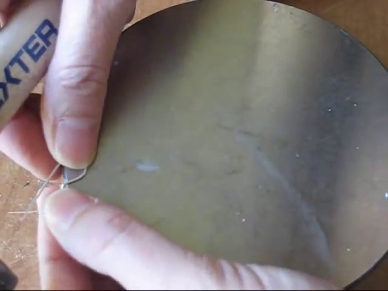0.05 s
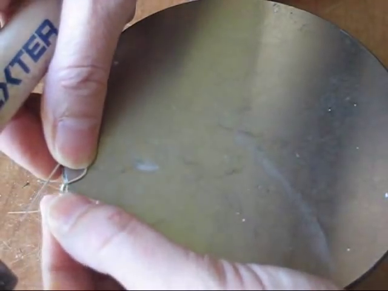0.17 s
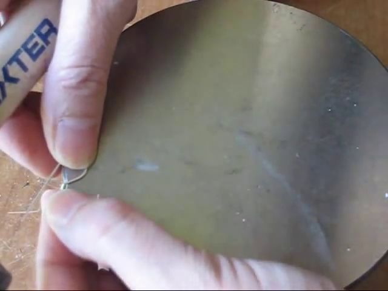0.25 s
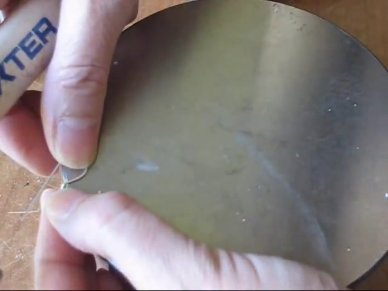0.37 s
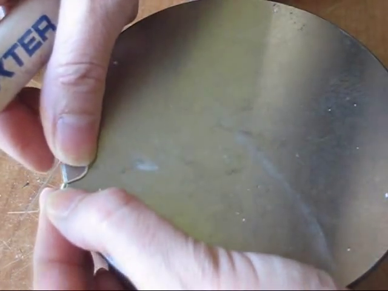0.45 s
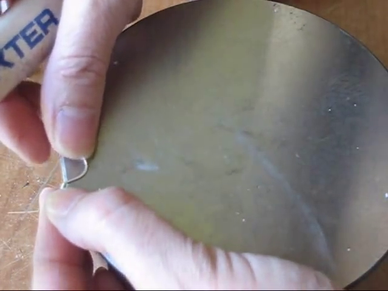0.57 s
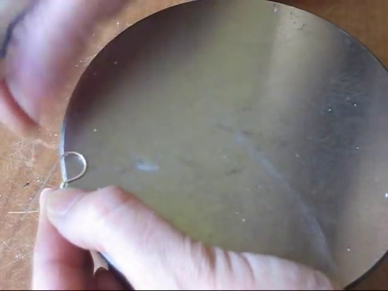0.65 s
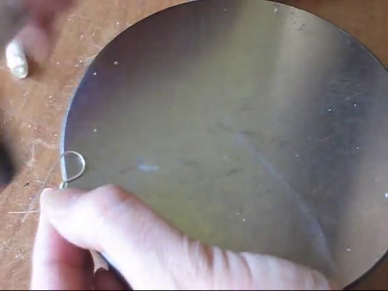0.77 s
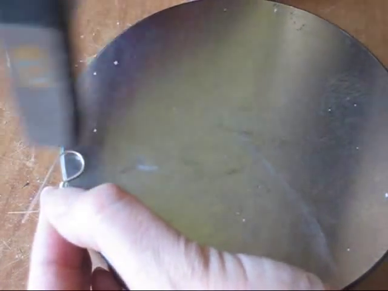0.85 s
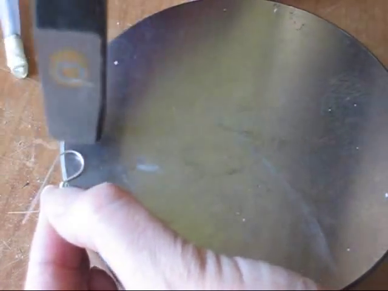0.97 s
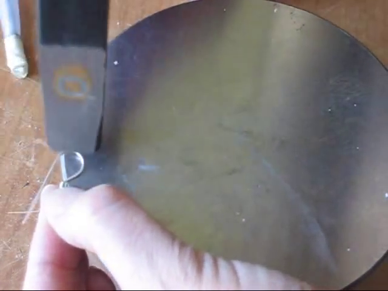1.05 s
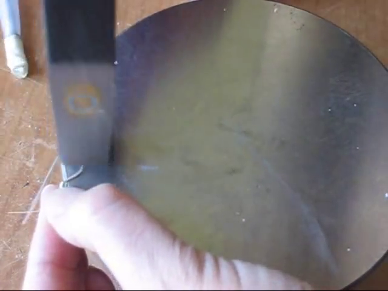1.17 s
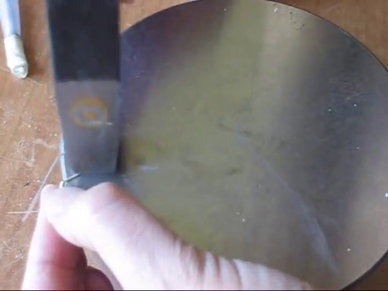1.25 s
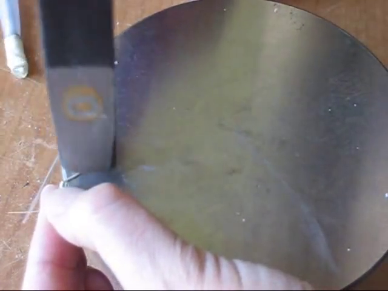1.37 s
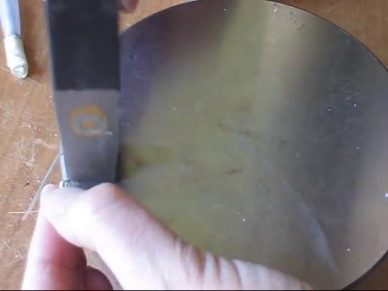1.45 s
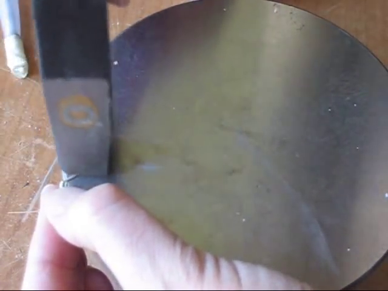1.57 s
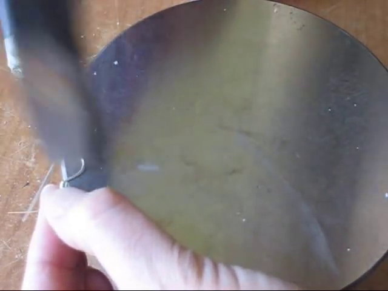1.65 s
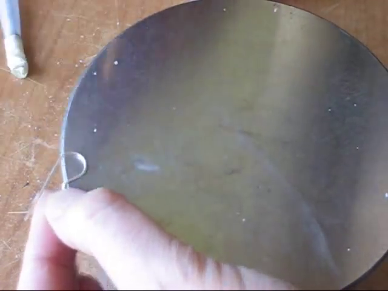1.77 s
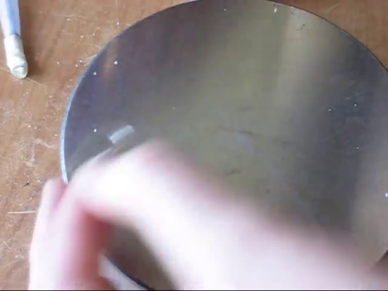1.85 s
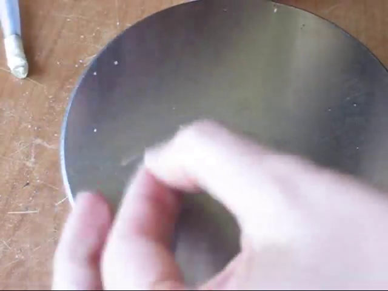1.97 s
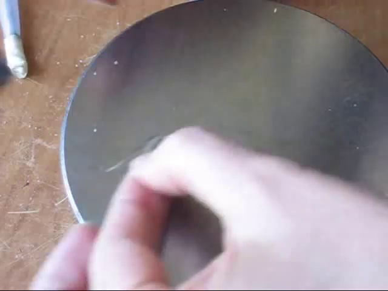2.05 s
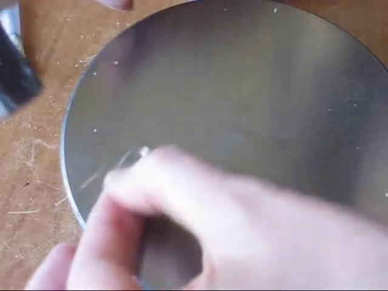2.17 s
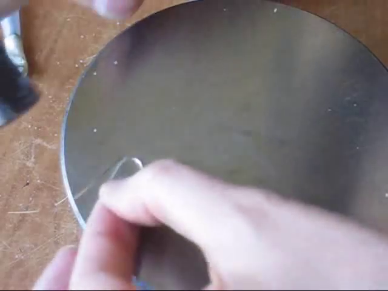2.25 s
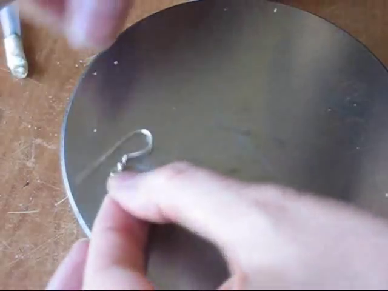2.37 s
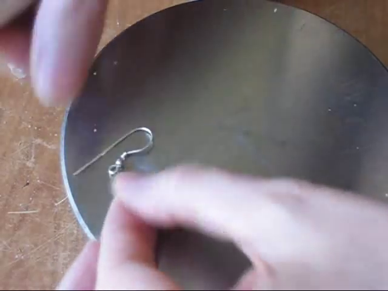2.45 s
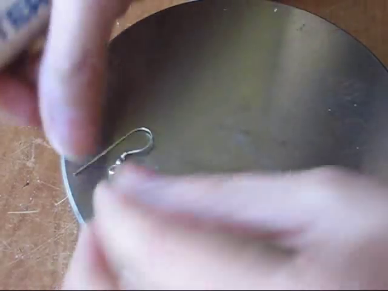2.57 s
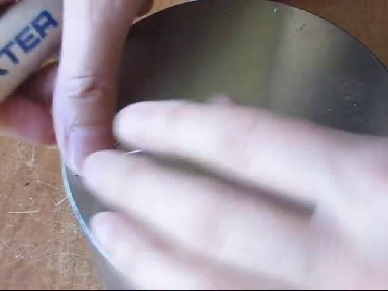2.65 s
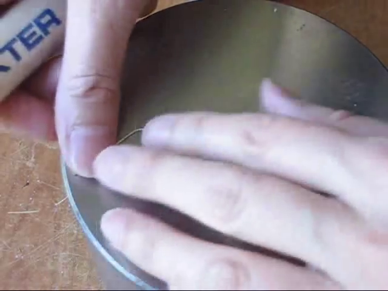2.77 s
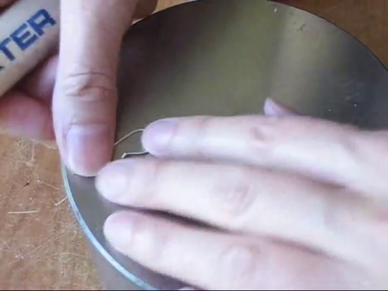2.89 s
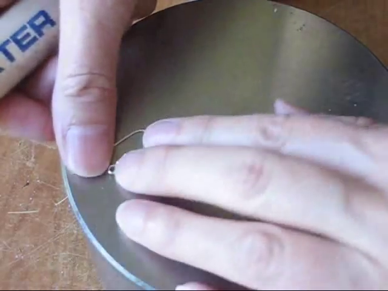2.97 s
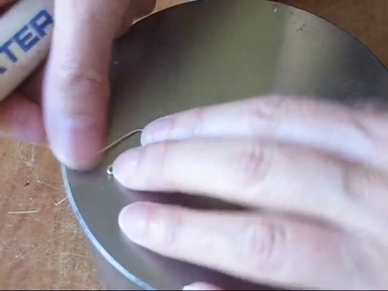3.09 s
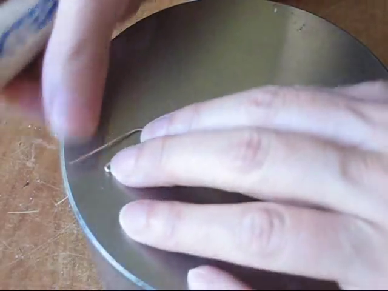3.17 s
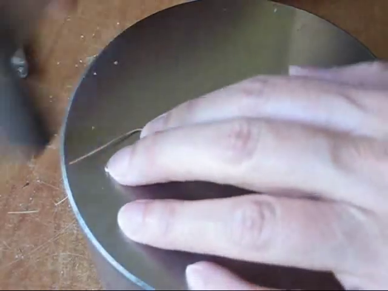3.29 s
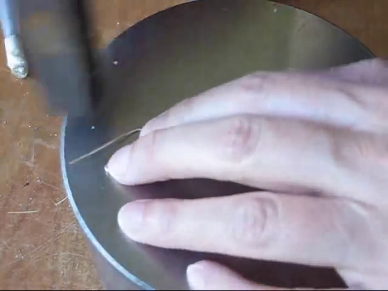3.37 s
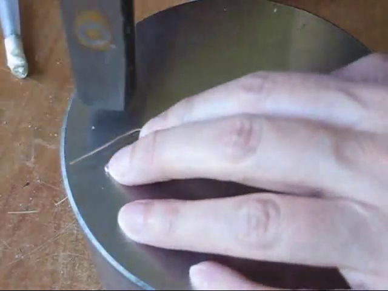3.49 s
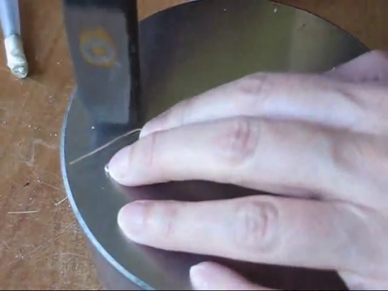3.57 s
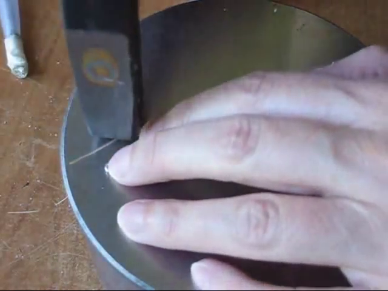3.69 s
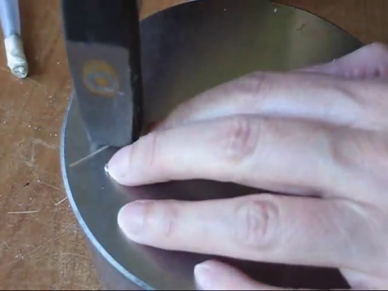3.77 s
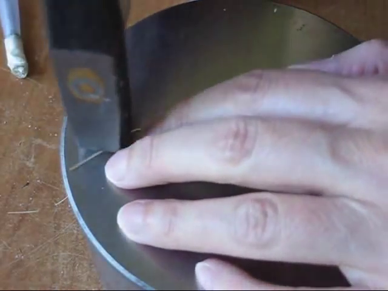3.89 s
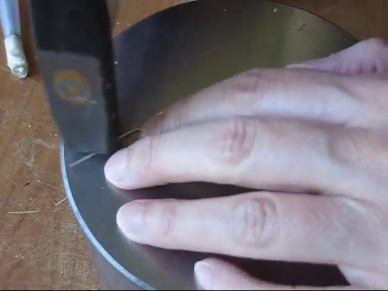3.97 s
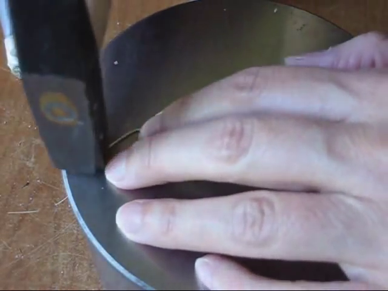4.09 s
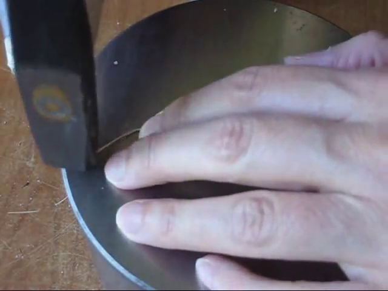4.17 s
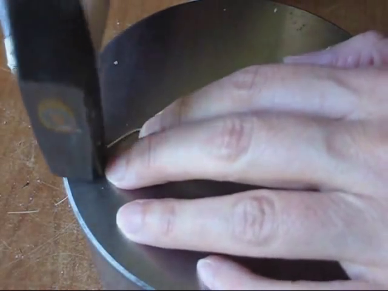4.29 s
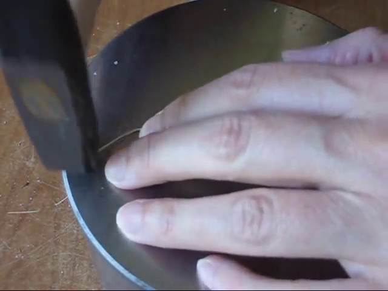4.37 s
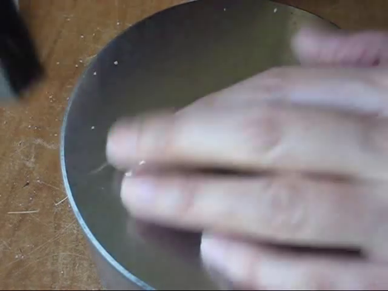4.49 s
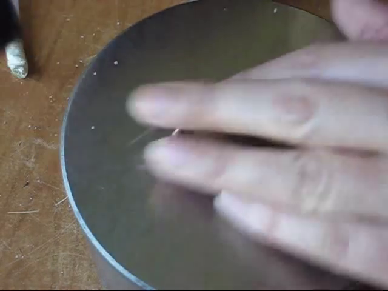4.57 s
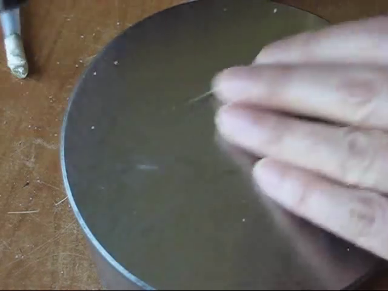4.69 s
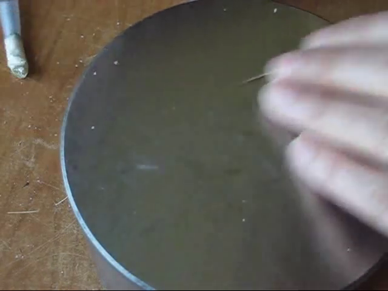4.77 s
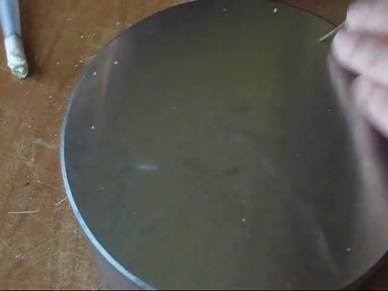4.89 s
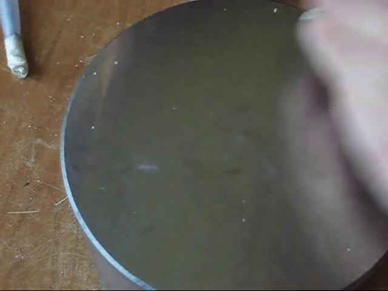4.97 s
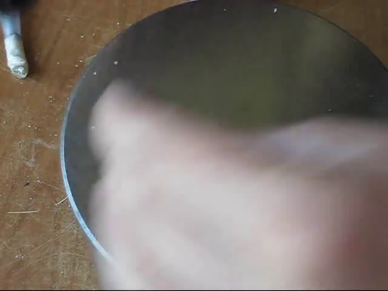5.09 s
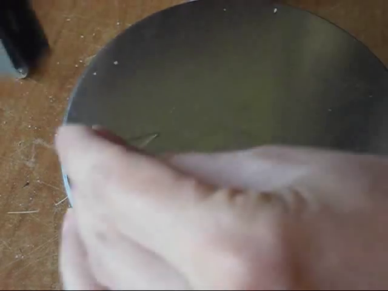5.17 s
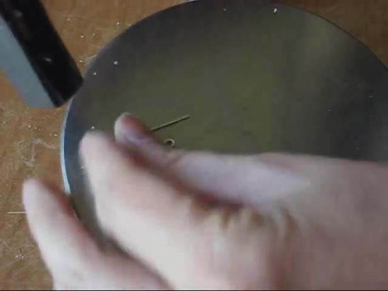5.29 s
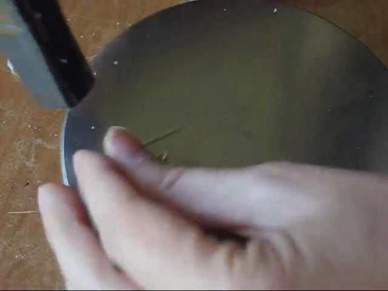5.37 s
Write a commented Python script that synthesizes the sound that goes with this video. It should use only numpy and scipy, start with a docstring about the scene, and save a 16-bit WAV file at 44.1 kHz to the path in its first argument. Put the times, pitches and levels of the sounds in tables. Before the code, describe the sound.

A close, coarse pocket-camera sound of hammering at a bench in a small room. Gritty hiss, a thin buzzing electronic whine and a faint gliding low drone run throughout. A barely audible scrape comes near 0.8 s. At about 1.27, 1.49 and 1.64 s a light hammer hits wire on a steel block: hard, short clinks, the second strongest with a brief wire ring, each followed by a tiny rebound click and a dull wooden table thump. The room answers for about half a second. At 2.0 s a hand bumps the table softly; low rumble swells near 3 s, with a small scratch at 3.26 s. The second group falls at 3.68 s, bright and thin, 3.83 and 4.14 s, weaker and duller, and 4.35 s, loud and ringing. The tail fades into hiss; tiny scratches at 5.2-5.3 s accompany a last low rumble.

```python
"""At a bench in a small room, a light hammer flattens a wire on a steel block in two quick groups of taps.
Damped modes ring the block, hammer head and wire; swelling and dying low modes thump the wooden table.
Decaying noise gives the room's answer; scrapes, a nudge, rumble, hiss and a gliding drone lie beneath.
A pocket camera listens: its own whine, gain control and a coarse 8-bit, 11 kHz converter."""
import sys
import numpy as np
from scipy import signal
from scipy.fft import rfft, irfft, next_fast_len
from scipy.io import wavfile

SR = 44100
rng = np.random.default_rng(int(sys.argv[2]) if len(sys.argv) > 2 else 0)


def log_audio(samples):
    """Write samples as a 16-bit WAV file to the path given in sys.argv[1]."""
    # one column per channel
    frames = np.atleast_2d(samples).T
    # limit to full scale, then quantise
    limited = np.clip(frames, -1, 1)
    pcm = np.round(limited * 32767).astype(np.int16)
    wavfile.write(sys.argv[1], SR, pcm)


N = 239683  # samples
TIME = np.arange(N) / SR  # s


def amp(db):
    """Level law: amplitude gain is ten to the power dB / 20."""
    return 10 ** (np.asarray(db) / 20)


def unit(x):
    """Normalisation to a root-mean-square amplitude of 1."""
    return x / np.sqrt(np.mean(x ** 2))


def along(points, hz):
    """Linear interpolation of a (frequency [Hz], value) table on a logarithmic frequency axis."""
    f, v = np.transpose(points)
    return np.interp(np.log(hz + 1), np.log(f), v)


def dying(t, t60):
    """Exponential decay of a damped mode, 60 dB down at t60 seconds."""
    return np.exp(-np.log(1000) * t / t60)


def filtered(x, gain):
    """Linear filtering: the spectrum of x times a gain that depends on frequency."""
    size = next_fast_len(len(x) + 8192)  # zero padding limits wrap-around
    spectrum = rfft(x, size)
    hz = np.fft.rfftfreq(size, 1 / SR)
    return irfft(spectrum * gain(hz), size)[:len(x)]


def band_noise(size, low_hz, high_hz):
    """Band-limited noise of rms 1, with a gentle lower edge and a steeper upper one."""
    def band(f):
        low_edge = (f / low_hz) ** 2
        return low_edge / (1 + low_edge) / (1 + (f / high_hz) ** 10)
    return unit(filtered(rng.standard_normal(size), band))


def swells(events):
    """Gaussian envelopes, one for each (time [s], level [dB], length to 1/e [s]) event."""
    return sum(amp(db) * np.exp(-((TIME - s) / length) ** 2) for s, db, length in events)


def add(track, s, sound):
    """Superposition: mix a sound into the track at s seconds."""
    part = track[round(s * SR):][:len(sound)]
    part += sound[:len(part)]


def hiss(hiss_db=-49):
    """Stationary random noise, coloured by a smooth spectral envelope."""
    # spectral shape of the noise: (frequency [Hz], relative level [dB per Hz])
    colour = [(20, 1.5), (60, 10), (110, 7), (220, 5), (450, 1.5), (1000, -2), (2500, -3), (3400, -3),
              (4200, -4), (5500, -14)]
    return amp(hiss_db) * unit(filtered(rng.standard_normal(N), lambda f: amp(along(colour, f))))


def drone():
    """Resonance: two harmonics, perhaps of a distant motor, glide and swell where they meet room modes."""
    # speeding up and easing off: (time [s], fundamental frequency [Hz])
    glide = [(0, 87.5), (1.0, 95.36), (3.5, 108.1), (5.43, 97.8)]
    # fundamental, then octave, away from any resonance: (level [dB rms])
    partial_db = [-63, -69]
    # room resonances: (frequency [Hz], half width [Hz], lift [dB])
    lifts = [(92.1, 3, 11), (208.3, 1.8, 12)]
    hz = np.interp(TIME, *np.transpose(glide))
    phase = 2 * np.pi * np.cumsum(hz) / SR

    def lift_db(f):
        return sum(db / (1 + ((f - centre) / width) ** 2) for centre, width, db in lifts)
    partials = sum(amp(db + lift_db(k * hz)) * np.sin(k * phase) for k, db in enumerate(partial_db, 1))
    return np.sqrt(2) * partials


def whine(frame_rate=30):
    """Phase modulation: two electronic tones jump in phase at every picture frame, giving a fine buzz."""
    # the camera's electronics: (frequency [Hz], offset within each frame [Hz], level [dB rms])
    tones = [(2778, -12.5, -51), (3177, -16.5, -55)]
    in_frame = TIME % (1 / frame_rate)  # s since the frame began
    return sum(np.sqrt(2) * amp(db) * np.sin(2 * np.pi * (hz * TIME + offset * in_frame))
               for hz, offset, db in tones)


def rumble(centre_hz=64, width_hz=5, rest_db=-69):
    """Resonant filtering: narrow noise in the table's lowest modes swells as hands lean on the block."""
    # the hands lean: (time [s], level [dB], length to 1/e [s])
    leans = [(2.95, -61, .45), (5.33, -54, .12)]
    noise = unit(filtered(rng.standard_normal(N), lambda f: 1 / (1 + ((f - centre_hz) / width_hz) ** 2)))
    return (amp(rest_db) + swells(leans)) * noise


def thump(t, swell=0.0034, steepness=3):
    """Forced motion: the pushed table top swings for a few cycles under a pulse peaking at swell seconds."""
    # the table top giving way under the block: (frequency [Hz], level [dB])
    table_modes = [(210, -9.5), (450, -16), (1040, -29.5)]
    push = (t / swell * np.exp(1 - t / swell)) ** steepness
    swings = sum((-1) ** k * amp(db) * np.sin(2 * np.pi * hz * t) for k, (hz, db) in enumerate(table_modes))
    return push * swings


def boom(t, deep_db, rise=0.004, pivot_hz=200, tilt_db=1.34, deep_hz=136):
    """Modal reverberation: low modes build up after the push and die slowly."""
    # low modes of table and room: (frequency [Hz], level before colouring [dB], t60 [s])
    low_modes = [(63.1, -21, 0.28), (68.3, -21.5, 0.35), (106.7, -27, 0.3), (131.4, -20, 0.27),
                 (160.3, -33, 0.65), (182, -26.5, 0.59), (189.1, -27.5, .48), (219.4, -30, 0.4),
                 (236.4, -33, .42), (257.7, -34.5, 0.69), (278, -27.5, .48), (307, -33.5, 0.64),
                 (332.6, -27.5, 0.17), (365, -43, 0.84), (412, -33, 0.3), (445, -31.5, .38),
                 (645, -34.5, 0.24), (701, -38.5, 0.37), (752, -35.5, 0.2), (899, -46.5, 0.53),
                 (1078, -42, 0.34)]

    def colour_db(hz):
        tilt = tilt_db * np.log2(hz / pivot_hz)  # tilt_db per octave
        return tilt + deep_db / (1 + (hz / deep_hz) ** 4)  # deep_db acts mostly below deep_hz
    modes = sum((-1) ** k * amp(db + colour_db(hz)) * dying(t, t60) * np.sin(2 * np.pi * hz * t)
                for k, (hz, db, t60) in enumerate(low_modes))
    return modes * (1 - np.exp(-t / rise))


def scrapes():
    """Friction noise: fingers shift the wire on the steel, in faint bursts of high-frequency noise."""
    # (time [s], level [dB], length to 1/e [s])
    shifts = [(0.766, -53, 0.061), (3.257, -48.5, 0.0084), (5.192, -44, 0.0069), (5.271, -42, 0.0037),
              (5.322, -46, 0.01)]
    return swells(shifts) * band_noise(N, 4300, 6100)


def nudge(deep_db=-3):
    """Impulsive excitation: a hand settles against the table and moves its low modes."""
    # (time [s], level [dB])
    nudges = [(2.035, -28.5)]
    track, t = np.zeros(N), np.arange(SR // 2) / SR
    for s, db in nudges:
        add(track, s, amp(db) * (thump(t) + boom(t, deep_db)))
    return track


def room(t, dip_s=0.027, dip_width=0.011, dip_db=-2.0, first_wall=0.007):
    """Diffuse reverberation: noise decays at a rate set by frequency, with a brief dip around dip_s."""
    # tone of the room's answer, tail at unit energy: (frequency [Hz], gain [dB])
    walls = [(60, -14), (130, -12.5), (210, -13), (400, -1), (550, -4.5), (740, 4.5), (1100, -2),
             (1500, -12), (2400, -17), (2950, -9), (3400, -8.5), (4100, -8), (5300, -10.5)]
    # decay of the answer: (frequency [Hz], t60 [s])
    fade = [(150, 0.61), (500, 0.54), (1500, 0.58), (3300, 0.56), (5500, 0.61)]
    hz, s, z = signal.stft(rng.standard_normal(len(t)), SR, nperseg=256)
    decayed = z * dying(s, along(fade, hz)[:, None])
    tail = signal.istft(decayed, SR, nperseg=256)[1][:len(t)]
    tail = tail * amp(dip_db * np.exp(-((t - dip_s) / dip_width) ** 2))
    tail = filtered(tail / np.linalg.norm(tail), lambda f: amp(along(walls, f)))
    # the answer builds up over about the delay of the nearest wall (s)
    return tail * (1 - np.exp(-(t / first_wall) ** 2))


def ring(t, modes):
    """Modal superposition: damped modes of a metal part, a little different in level at every blow."""
    hz, db, t60 = np.transpose(modes)[:, :, None]
    scatter_db = 0.7 * rng.standard_normal(hz.shape)
    sign = (-1) ** np.arange(len(hz))[:, None]
    return np.sum(sign * amp(db + scatter_db) * dying(t, t60) * np.sin(2 * np.pi * hz * t), axis=0)


def wire_ring(t, block_db, hard_db=4, growth=4.3):
    """Nonlinear excitation: ring grows by growth dB for each dB of the blow, so hard blows sing."""
    # the wire's free end: (frequency [Hz], level at a blow of hard_db [dB], t60 [s])
    wire_modes = [(2896, -25, 0.065), (4990, -40, .08), (5080, -33, 0.1)]
    return amp(growth * (block_db - hard_db)) * ring(t, wire_modes)


def clink(t, block_db, head_db, rise=0.0001, crack_db=-11, crack_t60=0.009):
    """Impact of steel on steel: block and head ring in shares set by how the face lands, over a crack."""
    # the steel block: (frequency [Hz], relative level [dB], t60 [s])
    block_modes = [(1469, -11, 0.018), (1738, -7.5, 0.016), (2152, -1.5, 0.0073), (2440, -1, 0.0077),
                   (2774, -2, 0.0097), (3273, -5, .018), (4500, -14.5, 0.0099)]
    # the hammer's head: (frequency [Hz], relative level [dB], t60 [s])
    head_modes = [(865, -15, 0.0063), (1175, -20, 0.042), (1920.4, -7.5, 0.0069), (2406, -1, 0.003),
                  (3473, -5.5, 0.013), (4213, -13, 0.0086), (5303, -1.5, 0.008)]
    crack = amp(crack_db) * band_noise(len(t), 400, 5200) * dying(t, crack_t60)
    steel = amp(block_db) * ring(t, block_modes) + amp(head_db) * ring(t, head_modes)
    blow = np.hypot(amp(block_db), amp(head_db))
    return (steel + blow * crack) * (1 - np.exp(-t / rise))


def hammer(room_db=-1, rebound_head_db=-10.5):
    """Impulse response: convolution gives the room's answer, drawn afresh for each tap and rebound."""
    # (time [s], block [dB], hammer head [dB], thump [dB], deepest table modes against the rest [dB])
    taps = [(1.2741, 4, -9, 3.5, 3), (1.4911, 7, -2.5, 4.5, -4.5), (1.639, 3.5, -9, 2.5, -2),
            (3.6798, 1.5, 4, -7, -2), (3.8287, -7.5, -43, -5, 1.5), (4.1413, -6, -29, 2.5, 4),
            (4.3458, 8, 2, 3.5, -4)]
    # the loosely held hammer falls back once after each tap of the first group,
    # too lightly to thump the table: (time [s], block [dB])
    rebounds = [(1.3037, -9), (1.4997, -8), (1.6482, -4)]
    track, t = np.zeros(N), np.arange(SR * 3 // 4) / SR

    def in_room(direct):
        return direct + amp(room_db) * signal.fftconvolve(direct, room(t))[:len(t)]
    for s, block_db, head_db, thump_db, deep_db in taps:
        direct = clink(t, block_db, head_db) + amp(thump_db) * thump(t)
        table_boom = amp(thump_db) * boom(t, deep_db)
        add(track, s, in_room(direct) + wire_ring(t, block_db) + table_boom)
    for s, block_db in rebounds:
        add(track, s, in_room(clink(t, block_db, block_db + rebound_head_db)))
    return track


def scene():
    """Superposition of everything that reaches the camera's amplifier."""
    background = hiss() + drone() + whine() + rumble()
    handling = scrapes() + nudge()
    return (background + handling + hammer())[None]


def gain_control(x, threshold_db=-22, depth_db=7, release_db=4.5, start_db=6, attack=0.004):
    """Dynamic compression: loud peaks turn the gain down; it creeps back by release_db a second."""
    excess = np.clip(20 * np.log10(np.abs(x) + 1e-9) - threshold_db, 0, depth_db)
    # a running maximum on a rising ramp holds each peak; taking off the ramp releases it
    ramp = release_db * TIME
    held = np.maximum(np.maximum.accumulate(excess + ramp), start_db) - ramp
    keep = np.exp(-1 / (attack * SR))  # one-pole smoothing, attack in s
    cut_db = signal.lfilter([1 - keep], [1, -keep], held - start_db) + start_db
    return x * amp(-cut_db)


def record(dry, hold=4, step=1 / 128, offset=-0.0065, top_hz=15600):
    """Sampling and quantisation: clipped, rounded, held values mirror the sound into the treble."""
    x = filtered(gain_control(dry[0]), lambda f: 1 / np.sqrt(1 + (f / 5600) ** 24))
    codes = np.round(np.clip(x[::hold] + offset, -1, 1) / step)
    stairs = np.repeat(codes * step, hold)[:N]
    return filtered(stairs, lambda f: f < top_hz)[None]


dry = scene()
out = record(dry)
log_audio(out)
```